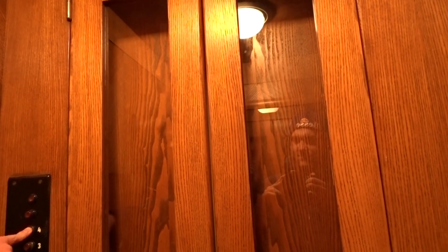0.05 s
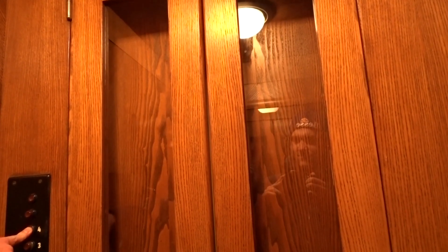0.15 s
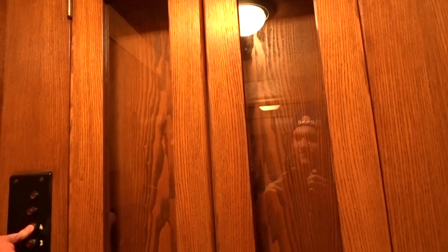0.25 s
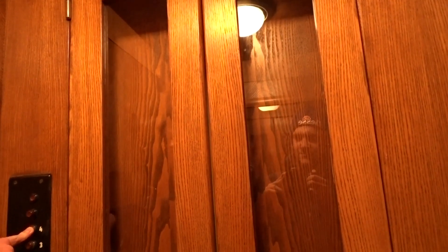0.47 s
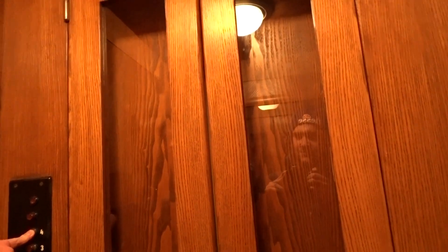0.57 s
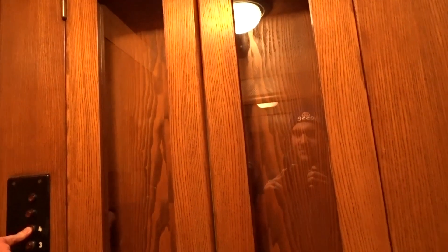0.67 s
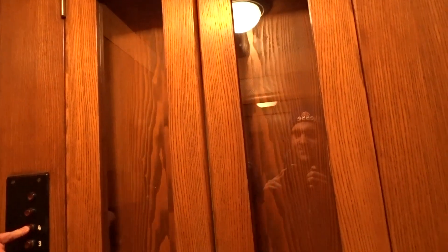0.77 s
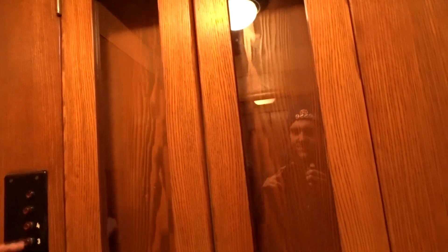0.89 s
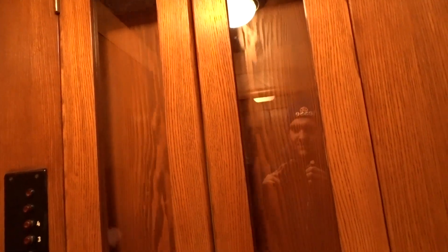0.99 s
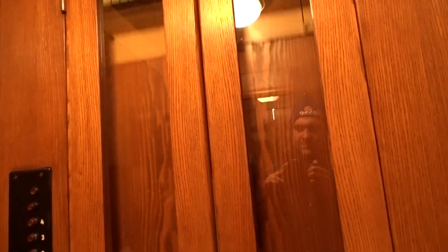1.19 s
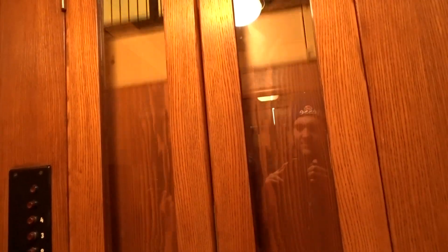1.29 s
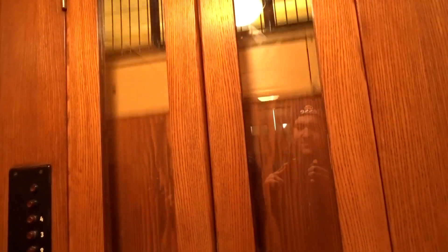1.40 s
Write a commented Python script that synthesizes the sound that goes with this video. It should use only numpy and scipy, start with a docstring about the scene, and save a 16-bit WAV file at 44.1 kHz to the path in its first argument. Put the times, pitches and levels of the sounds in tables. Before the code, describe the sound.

An old wooden lift starts, heard from inside. A button clicks and knocks at about 0.2 seconds. At 0.3 the door bolt slams loudly and rattles, with panel thuds and a slight shaft echo. A low rumble follows from 0.5. A latch clacks at 0.8 as a soft rail hiss begins. A small bump comes just after 1 second, and the motor hum swells until about 1.5.

```python
"""An old wooden lift starts, heard from inside the car. Over still air the button clicks and knocks home;
the shaft echoes, the wall panels thud and the car jolts. The door bolt slides, slams and rattles, each
impact exciting decaying modes, and the car shudders. The running gear rumbles and the motor hum rises.
Friction makes the guide shoes hiss along their rails, a latch clacks, and the shoes bump over a rail
joint as the drone of the winding gear swells."""
import sys
import numpy as np
from scipy import signal
from scipy.fft import rfft, irfft
from scipy.io import wavfile
from scipy.ndimage import uniform_filter1d

SR = 44100
rng = np.random.default_rng(int(sys.argv[2]) if len(sys.argv) > 2 else 0)


def inscribe(sig):
    """Save sig as 16-bit PCM at rate SR to the path in sys.argv[1].

    A 1-D sig is mono; a 2-D sig holds one channel per row.
    Samples are clipped to [-1, 1] before scaling.
    """
    pcm = np.round(np.clip(np.atleast_2d(sig).T, -1, 1) * 32767)
    wavfile.write(sys.argv[1], SR, pcm.astype(np.int16))


N = 63945
T = np.arange(N) / SR
FREQS = np.fft.rfftfreq(2 ** 16, 1 / SR) + 1
CONTACT_S = 0.00063  # rise time of a hard blow
DAMPING = 0.23  # a dense ring's t60 falls as this power of frequency

# stereo side relative to mid: frequency_hz, level_db
WIDTH = [(30, -32), (70, -52), (250, -24.5), (500, -16.5), (1000, -12.5), (2000, -8.5), (4000, -12.5),
         (6000, -23.5), (8000, -20), (10000, -2.5), (14000, -18)]
# still air in the car: frequency_hz, density_db (relative, as in every spectrum below)
AIR_SPECTRUM = [(25, -3), (70, -0.5), (130, -8), (195, 6), (300, -3), (480, 0), (650, 1.5), (850, -5.5),
                (1300, 1), (2000, -11), (4000, -17), (8500, -9.5), (15500, -15.5)]

# metal clicks of the button: start_s, level_db
CLICKS = [(.1635, -44.5), (0.166, -34)]
# their modes: pitch_hz, level_db, t60_s
CLICK_MODES = [(598, -17, 0.23), (770, -10, 0.26), (1265, -11.5, 0.15), (3180, -14, 0.13), (5850, -26, .09),
               (7601, -8.5, 0.15)]
# their dense ring: frequency_hz, density_db
CLICK_RING = [(380, -7), (700, 4.5), (1100, -10), (2300, -10), (4200, -15), (5700, -1), (6800, -12),
              (8200, -9), (9500, -17.5), (10700, -17), (12000, -33), (16000, -25)]
# wooden knock of the button and its rebounds: start_s, level_db
KNOCKS = [(.2178, -25.5), (.2215, -20.5), (.2315, -44), (.249, -29)]
# modes of the wood: pitch_hz, level_db, t60_s
KNOCK_MODES = [(467, -7.5, 0.16), (685, 2, 0.13), (741, -4, 0.18), (785, -16, .17), (1404, -15, 0.12),
               (1810, -8, 0.046), (2590, -22, .06), (3313, -16, 0.088), (3243, -10, 0.06)]
# its dense ring: frequency_hz, density_db
KNOCK_RING = [(130, -15), (210, 5), (380, -19.5), (750, 4.5), (1150, -10.5), (1700, -9), (2100, -17.5),
              (2700, -4.5), (3300, -24), (3800, -21), (8000, -28), (10500, -38.5), (12700, -34),
              (16000, -34)]
# echo of the shaft: frequency_hz, density_db
SHAFT_SPECTRUM = [(60, -4), (200, -12), (400, 6.5), (650, 0), (1000, -1.5), (2000, -5), (3500, -11.5),
                  (7000, -11.5), (16000, -38)]

# thuds in the wall panels: start_s, level_db
THUDS = [(0.2208, -21), (0.3317, -19), (0.3741, -12.5), (1.051, -35)]
# panel modes: pitch_hz, level_db, t60_s
PANEL_MODES = [(183.2, 1.5, 0.21), (195.9, -16.5, 1.0), (212, -17, 0.19), (241, -5.5, 0.18),
               (251.5, 0, 0.21), (303.2, -13, 0.3)]
# jolts of the car: start_s, level_db
JOLTS = [(0.234, -32.5), (0.33, -36), (0.4876, -20.5), (.745, -33)]
# low modes of the car: pitch_hz, level_db, t60_s
CAR_MODES = [(40.8, -7.5, 0.36), (58.98, -9.5, 1.84), (82, 2, 0.29), (100.8, 4.5, 0.21), (109, -15.5, 1.04)]
# shudder after the slam: frequency_hz, density_db
SHUDDER_SPECTRUM = [(20, -4), (38, -3.5), (60, 0), (120, -12.5), (220, -3), (500, -66.5)]

# friction of the sliding bolt: frequency_hz, density_db
SLIDE_SPECTRUM = [(900, 1), (2500, -0.5), (4000, 0), (5500, 2.5), (7800, 3.5), (9500, -9), (11500, -14),
                  (16000, -31)]
# the bolt's first touch and full blow: start_s, level_db
BOLT_BLOWS = [(0.3193, -14), (.3245, -13.5)]
# their crack: frequency_hz, density_db
CRACK_SPECTRUM = [(450, -29), (800, 10.5), (1400, -3.5), (3200, -4), (4200, -12), (5700, -9.5), (7000, -22),
                  (16000, -31)]
# rattle of the lock: start_s, housing_db, steel_db
RATTLE = [(.3255, -15.5, -26), (.3405, -14.5, -21.5), (.354, -17.5, -32), (.374, -23, -31),
          (0.387, -18.5, -36), (.417, -25, -58), (.434, -43, -66)]
# modes of the lock housing: pitch_hz, level_db, t60_s
HOUSING_MODES = [(593, -15.5, 0.56), (650, -14.5, 0.67), (796.5, -8.5, 0.29), (842.5, -13, 0.57),
                 (968.4, -9.5, 0.29), (1057, -16, 0.54), (1346, -12.5, 0.28), (1568, -25, 0.35),
                 (1897, -14, 0.19), (1920, -10.5, 0.16), (2344, -16, .28), (2650, -13, 0.18),
                 (2890, -23, 0.11), (3021, -12.5, 0.25)]
# its dense ring: frequency_hz, density_db
HOUSING_RING = [(150, -1), (400, -8.5), (600, -1), (850, 1.5), (1150, -7.5), (1900, -3.5), (3200, -9),
                (3800, -14.5), (5800, -15), (8000, -21.5), (16000, -62)]
# modes of the loose steel: pitch_hz, level_db, t60_s
STEEL_MODES = [(3960, -18.5, 0.33), (6700, -12, 0.18), (14795, -24, .22)]
# its dense ring: frequency_hz, density_db
STEEL_RING = [(1500, -7), (4000, -8.5), (6500, -2.5), (8500, 0.5), (10200, -4.5), (11200, -9.5),
              (16000, -15.5)]

# envelope of the running gear's rumble: time_s, gain_db
RUMBLE_ENVELOPE = [(.3, -58), (.55, 2), (.78, -6), (.88, 0.5), (1.0, -1), (1.06, -3.5), (1.13, 1),
                   (1.29, -1.5), (1.45, -5.5)]
# its colour: frequency_hz, density_db
RUMBLE_SPECTRUM = [(20, -14), (55, 1), (105, 2), (140, -13), (190, -4.5), (280, -1), (400, -10.5),
                   (600, -10), (850, -12.5), (1500, -27), (3000, -34.5), (8000, -53)]
# partials of the motor hum: harmonic_number, level_db
HUM_HARMONICS = [(1, -50), (2, -44), (3, -47.5), (6, -60)]
# envelope of the winding gear's drone: time_s, level_db
DRONE_ENVELOPE = [(.85, -110), (1.0, -57), (1.09, -41), (1.16, -39), (1.3, -32.5), (1.35, -44.5),
                  (1.45, -31.5)]

# envelope of the guide shoes' hiss: time_s, level_db
HISS_ENVELOPE = [(0, -64), (.5, -64), (.79, -60.5), (.84, -46.5), (.9, -39), (1.02, -45.5), (1.06, -43),
                 (1.11, -46), (1.22, -49), (1.32, -52.5), (1.45, -50.5)]
# its colour: frequency_hz, density_db
HISS_SPECTRUM = [(500, 11.5), (1200, 4.5), (2500, 3.5), (4500, 0), (6500, 0.5), (8300, 3), (10500, -5),
                 (15500, -10.5)]
# brief bright scuffs of the shoes: start_s, level_db
SCUFFS = [(1.042, -39), (1.095, -40.5), (1.158, -39)]
# their colour: frequency_hz, density_db
SCUFF_SPECTRUM = [(2000, 1), (4000, -7), (9000, 2.5), (15000, -7)]
# bumps over a rail joint: start_s, level_db
BUMPS = [(1.044, -33.5), (1.051, -28.5)]
# their dense ring: frequency_hz, density_db
BUMP_RING = [(120, -17), (190, 5), (300, 0), (420, -6), (900, -2), (1400, -17.5), (1750, -8), (2700, -5.5),
             (3100, -28), (6000, -22), (16000, -40)]

# clacks of a latch: start_s, level_db
LATCH_BLOWS = [(0.8334, -33.5), (0.8363, -29)]
# its modes: pitch_hz, level_db, t60_s
LATCH_MODES = [(1077, -6, 0.14), (1300, -6.5, 0.097), (1440, -17, 0.054)]
# its dense ring: frequency_hz, density_db
LATCH_RING = [(250, -6), (750, -10), (1100, 7), (1800, -3.5), (2400, -5), (3300, -6), (4500, -15.5),
              (6500, -27), (16000, -48)]


def undb(db):
    """Amplitude ratio of a level in decibels."""
    return 10 ** (np.asarray(db) / 20)


def envelope(points):
    """Amplitude envelope through (time_s, level_db) points."""
    return undb(np.interp(T, *np.array(points).T))


def colour(points):
    """Magnitude response through (frequency_hz, level_db) points, rolling off below the first."""
    hz, db = np.array(points).T
    return undb(np.interp(np.log(FREQS), np.log(hz), db)) * np.minimum(FREQS / hz[0], 1) ** 2


def ramp(start_s, rise_s):
    """Raised-cosine onset from 0 to 1."""
    return np.sin(np.pi / 2 * np.clip((T - start_s) / max(rise_s, 1 / SR), 0, 1)) ** 2


def decay(t60_s):
    """Exponential damping: 60 dB down after t60_s."""
    return np.exp(-np.log(1000) * T / t60_s)


def wander(rate_hz):
    """Slow random modulation with a spread near 1."""
    hold = int(SR / rate_hz)
    return uniform_filter1d(np.repeat(rng.standard_normal(2 ** 7), hold)[:N], hold)


def noise(spectrum):
    """Random-phase stereo noise of unit rms, nearly mono in the bass."""
    mid, side = np.exp(2j * np.pi * rng.random((2, len(FREQS))))
    side = side * colour(WIDTH)
    x = irfft(np.array([mid + side, mid - side]) * colour(spectrum))[:, :N]
    return x / x.std()


def dense_ring(spectrum, blows, t60_s, rise_s=CONTACT_S):
    """Overlapping modes: blows add in energy, and high octaves decay first (t60_s holds at 1 kHz)."""
    bins, out = rfft(noise(spectrum), 2 ** 16), 0
    octave = np.clip(np.log2(FREQS / 1000), -3, 4)
    energy_in = np.diff(sum(undb(db) ** 2 * ramp(s, rise_s) for s, db in blows), prepend=0)
    for k in range(-3, 5):
        retained = np.exp(-2 * np.log(1000) * 2 ** (k * DAMPING) / (t60_s * SR))
        energy = signal.lfilter([1], [1, -retained], abs(energy_in) + 1e-18)
        band = irfft(bins * np.maximum(1 - abs(octave - k), 0))[:, :N]
        out = out + band * np.sqrt(energy)
    return out


def modes(table):
    """Free vibration as damped sines; the higher ones differ in phase between left and right."""
    out = 0
    for hz, db, t60_s in table:
        skew = np.interp(hz, FREQS, colour(WIDTH)) * rng.choice([-1, 1]) * np.array([[1], [-1]])
        out = out + np.sqrt(2) * undb(db) * np.sin(2 * np.pi * hz * T + skew) * decay(t60_s)
    return out


def strike(response, blows, rise_s=CONTACT_S):
    """Superposition: each (start_s, level_db) blow adds a delayed, scaled copy of the response."""
    out, ring = np.zeros((2, N)), response * ramp(0, rise_s)
    for start_s, db in blows:
        i = int(start_s * SR)
        out[:, i:] += undb(db) * ring[:, :N - i]
    return out


def impact(mode_table, spectrum, blows, t60_s):
    """Hard contact excites a body's distinct modes over a dense ring that decays with t60_s."""
    return strike(modes(mode_table), blows) + dense_ring(spectrum, blows, t60_s)


def air():
    """Stationary broadband noise: the still air of the car."""
    return undb(-60) * noise(AIR_SPECTRUM)


def button():
    """Impact excitation: metal clicks, then wood knocks as the button goes home and rebounds."""
    click = impact(CLICK_MODES, CLICK_RING, CLICKS, t60_s=0.22)
    knock = impact(KNOCK_MODES, KNOCK_RING, KNOCKS, t60_s=0.19)
    return click + knock


def shaft(sound):
    """Reverberation: convolution with the shaft's long, dull impulse response."""
    response = dense_ring(SHAFT_SPECTRUM, [(0.0049, 0)], t60_s=1.17, rise_s=0.031)
    response = response / np.sqrt(np.sum(response ** 2) / 2)  # unit energy per channel
    return undb(-22.5) * signal.fftconvolve(sound.mean(axis=0)[None], response, axes=1)[:, :N]


def car():
    """Structural resonance: the wall panels thud, and the whole car jolts and shudders."""
    shudder = strike(noise(SHUDDER_SPECTRUM) * decay(t60_s=1.29), [(0.325, -21)], rise_s=0.013)
    thuds = strike(modes(PANEL_MODES), THUDS, rise_s=0.0057)
    jolts = strike(modes(CAR_MODES), JOLTS, rise_s=0.013)
    return thuds + jolts + shudder


def lock():
    """Friction, then impact: the bolt slides, cracks against its housing and rattles the loose steel."""
    sliding = ramp(start_s=0.2868, rise_s=0.0089) - ramp(start_s=0.322, rise_s=0.0089)
    slide = undb(-33.5) * noise(SLIDE_SPECTRUM) * sliding
    crack = dense_ring(CRACK_SPECTRUM, BOLT_BLOWS, t60_s=0.05)
    clang = strike(modes(HOUSING_MODES), BOLT_BLOWS[1:])  # the full blow only
    housing = dense_ring(HOUSING_RING, [(s, db) for s, db, _ in RATTLE], t60_s=0.21)
    steel = impact(STEEL_MODES, STEEL_RING, [(s, db) for s, _, db in RATTLE], t60_s=0.24)
    return slide + crack + clang + housing + steel


def motor():
    """Forced vibration: gear rumble, harmonic hum on twice the mains frequency, and a swelling drone."""
    hum_hz, drone_hz, pitch_drift, waver_db = 99.7, 84, 0.009, 4.5
    phase_per_hz = 2 * np.pi * np.cumsum(1 + pitch_drift * wander(rate_hz=12.1)) / SR
    hum = 0
    for harmonic, db in HUM_HARMONICS:
        gain = undb(db + waver_db * wander(rate_hz=13.94))
        hum = hum + gain * np.sin(harmonic * hum_hz * phase_per_hz + 2 * np.pi * rng.random())
    drone = envelope(DRONE_ENVELOPE) * np.sin(drone_hz * phase_per_hz)
    rumble = undb(-37.5) * noise(RUMBLE_SPECTRUM) * envelope(RUMBLE_ENVELOPE)
    return rumble + np.sqrt(2) * (hum * ramp(start_s=0.62, rise_s=0.63) + drone)


def guide_shoes():
    """Sliding friction: the shoes hiss and scuff along the rails, and bump over a joint."""
    hiss = noise(HISS_SPECTRUM) * envelope(HISS_ENVELOPE) * undb(0.62 * wander(rate_hz=44.4))
    scuffs = strike(noise(SCUFF_SPECTRUM) * decay(t60_s=0.15), SCUFFS, rise_s=0.0065)
    bumps = dense_ring(BUMP_RING, BUMPS, t60_s=0.17, rise_s=0.0023)
    return hiss + scuffs + bumps


def latch():
    """Heavily damped modes: two quick impacts make one clack as the car moves off."""
    return impact(LATCH_MODES, LATCH_RING, LATCH_BLOWS, t60_s=0.11)


def scene():
    """Superposition of all sources; button, lock, latch and shoes also reverberate in the shaft."""
    balance = undb([[-0.5], [0]])  # left, right
    works = (button() + lock() + latch() + guide_shoes()) * balance
    return works + shaft(works) + car() + motor() + air()


def record(dry):
    """Soft saturation rounds the loudest peaks; a steep low-pass filter cuts the top."""
    cutoff_hz = 15900
    lowpass = signal.ellip(10, .2, 80, cutoff_hz, fs=SR, output="sos")
    return signal.sosfilt(lowpass, np.tanh(dry))


dry = scene()
out = record(dry)
inscribe(out)
```